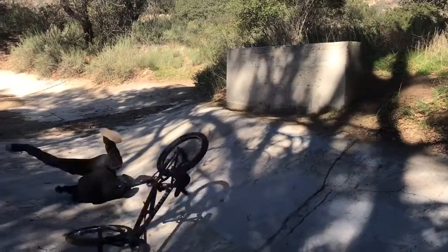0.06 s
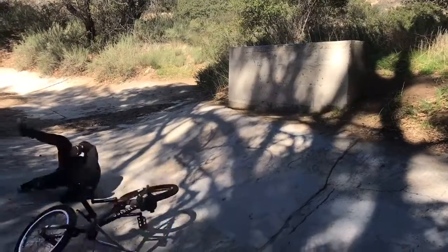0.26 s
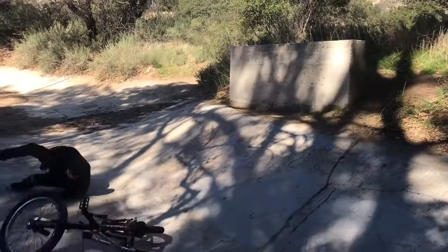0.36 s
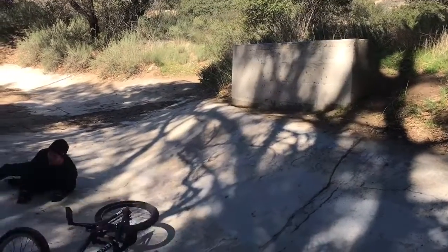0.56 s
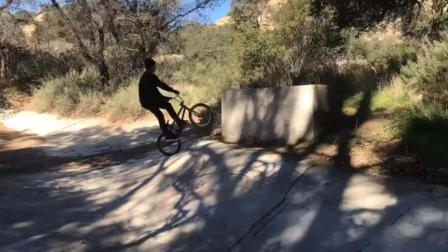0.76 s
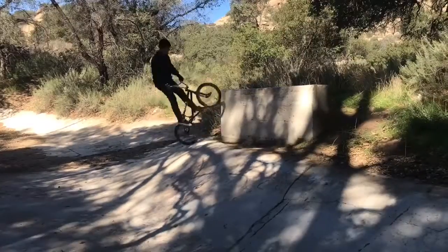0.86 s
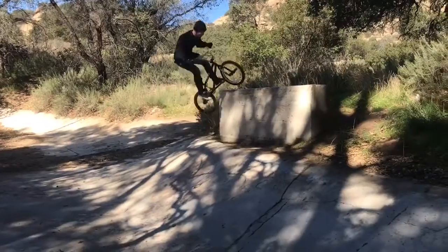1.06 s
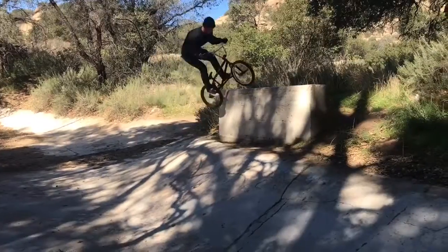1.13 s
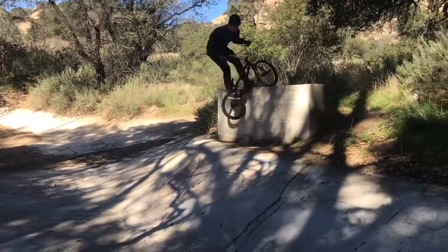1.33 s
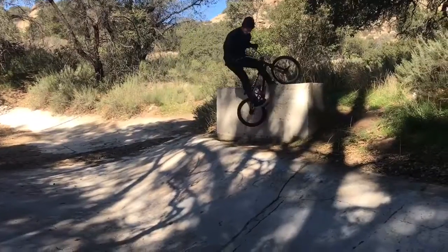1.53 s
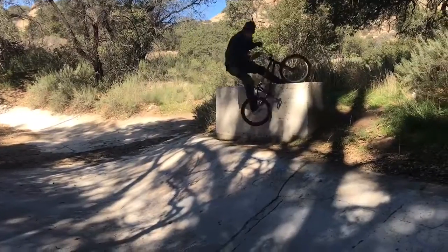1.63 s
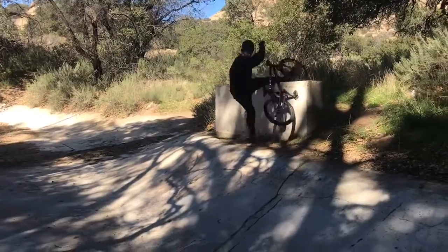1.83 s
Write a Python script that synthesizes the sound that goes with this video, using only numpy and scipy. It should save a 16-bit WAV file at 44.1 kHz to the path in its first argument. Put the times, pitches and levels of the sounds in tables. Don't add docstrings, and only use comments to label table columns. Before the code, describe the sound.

Bicycle slamming and scraping over concrete close by, abruptly followed by freewheel clicks and duller knocks

```python
import sys
import numpy as np
from scipy import signal
from scipy.fft import rfft, irfft, next_fast_len
from scipy.io import wavfile
from scipy.ndimage import map_coordinates

SR = 44100
rng = np.random.default_rng(int(sys.argv[2]) if len(sys.argv) > 2 else 0)


def ratio(d):
    e = np.asarray(d, float) / 20
    return 10 ** e


def int16_out(signal):
    q = np.round(np.clip(np.atleast_2d(signal).T, -1, 1) * 32767)
    wavfile.write(sys.argv[1], SR, q.astype(np.int16))


N = 83790
T = np.arange(N) / SR

# pitch_hz [Hz], level_db [dB]
CRACK_TONE = [(150, -36.5), (500, 3), (850, 4.5), (2000, 0), (4000, -2.5), (8000, -5.5), (10500, -10.5),
              (14000, -8.5), (16000, -12.5)]
# pitch_hz [Hz], level_db [dB], t60_s [s]
FRAME_MODES = [(663, -2.5, 0.092), (842.7, -3, 0.1), (914, 0, 0.067), (1164, -18, 0.25),
               (1290, -5.5, 0.029), (1730, -8.5, 0.026), (2300, -2, 0.042), (2675, 2.5, 0.019),
               (3740, 6.5, 0.013), (6160, -9.5, 0.043)]


def unit(x):
    return x / np.sqrt(np.mean(x ** 2) + 1e-20)


def along(points, hz):
    point_hz, value = np.transpose(points)
    return np.interp(np.log(hz + 1), np.log(point_hz + 1), value)


def level(rows):
    start_s, level_db = np.transpose(rows)[:2]
    return ratio(np.interp(T, start_s, level_db, left=-120, right=level_db[-1]))


def wobble(rate):
    knots = rng.standard_normal(int(N * rate / SR) + 4)
    return map_coordinates(knots, [T * rate])


def filtered(x, response):
    size = next_fast_len(len(x) + 8192)
    spectrum = rfft(x, size) * response(np.fft.rfftfreq(size, 1 / SR))
    return irfft(spectrum, size)[:len(x)]


def coloured_noise(count, tone):
    return filtered(rng.standard_normal(count), lambda f: ratio(along(tone, f)))


def frame_ring(t):
    out = np.zeros(len(t))
    for pitch_hz, level_db, t60_s in FRAME_MODES:
        struck_db = level_db + 2 * rng.standard_normal()
        out += ratio(struck_db - 60 * t / t60_s) * np.sin(2 * np.pi * pitch_hz * t)
    return out


def air():
    # pitch_hz [Hz], level_db [dB per Hz]
    air_tone = [(30, -25.5), (60, 0.5), (118, -10), (280, -16.5), (570, -26), (1200, -31), (1900, -42),
                (6000, -50), (16000, -59)]
    # start_s [s], level_db [dB over the still air]
    breeze = [(0, -10), (.85, 5.5), (.9, 6), (.99, 4), (1.06, 2.5), (1.2, 3), (1.4, 4), (1.9, -8)]
    low = lambda f: 1 / (1 + (f / 315) ** 4)
    rumble = filtered(rng.standard_normal(N), lambda f: ratio(along(air_tone, f)) * low(f))
    rumble = rumble * ratio(3.3 * wobble(13.22))
    leaves = filtered(rng.standard_normal(N), lambda f: ratio(along(air_tone, f)) * (1 - low(f)))
    leaves = leaves * level(breeze) * ratio(0.61 * wobble(45.4))
    return ratio(-42.5) * unit(rumble + leaves)


def scrape(rows, tone):
    grains_per_s, spread_db = 300, 5
    crackle_db, sing_db = -5, -21.5
    grit_above_hz = 4800

    grains = rng.random(N) < grains_per_s / SR
    grains = grains * ratio(spread_db * np.minimum(rng.exponential(size=N), 2))
    grain_decay = np.exp(-np.arange(400) / SR / .001)
    puffs = np.sqrt(np.abs(signal.fftconvolve(grains ** 2, grain_decay)[:N]))
    crackle = filtered(rng.standard_normal(N) * puffs, lambda f: ratio(along(tone, f)) * f / (f + 2500))

    hiss = sum(coloured_noise(N, tone) * ratio(3 * wobble(rate)) for rate in (30, 80))

    rubbing = rng.standard_normal(N) * ratio(3 * wobble(40))
    sing = signal.fftconvolve(rubbing, frame_ring(np.arange(SR // 4) / SR))[:N]

    mix = unit(hiss) + ratio(crackle_db) * unit(crackle) + ratio(sing_db) * unit(sing)
    grit = filtered(mix, lambda f: f ** 2 / (f ** 2 + grit_above_hz ** 2))
    start_s, _, bright_db = np.transpose(rows)
    grit_gain = ratio(np.interp(T, start_s, bright_db)) - 1
    return level(rows) * (mix + grit_gain * grit)


def knocks(rows, attack_s):
    bright_boost_db, bright_width = 11, .45
    chatter_db, chatter_t60_s = -17, .28
    frame_db = -8.5
    out = np.zeros(N + SR)
    t = np.arange(SR // 3) / SR
    rise = 1 - np.exp(-t / attack_s)
    for start_s, level_db, bright_hz, contact_s, t60_s in rows:
        def tone(f):
            peak = np.exp(-(np.log((f + 1) / bright_hz) / bright_width) ** 2)
            return ratio(along(CRACK_TONE, f) + bright_boost_db * peak)

        shape = rise * ratio(-60 * np.maximum(t - contact_s, 0) / max(t60_s, .008))
        lumps = np.clip(rng.standard_normal(len(t) // 110 + 1), -2, 1.3)
        lumpy = ratio(3 * np.repeat(lumps, 110)[:len(t)])
        burst = filtered(lumpy * rng.standard_normal(len(t)), tone) * shape
        burst = burst * np.linalg.norm(shape) / np.linalg.norm(burst)

        rattle = filtered(lumpy * rng.standard_normal(len(t)), lambda f: ratio(along(CRACK_TONE, f)))
        chatter = unit(rattle) * rise * ratio(chatter_db - 60 * t / chatter_t60_s)

        push = shape[:600] * rng.standard_normal(600)
        steel = signal.fftconvolve(frame_ring(t), push / np.linalg.norm(push))[:len(t)]

        out[round(start_s * SR):][:len(t)] += ratio(level_db) * (burst + chatter + ratio(frame_db) * steel)
    return filtered(out[:N], lambda f: f ** 2 / (f ** 2 + 260 ** 2))


def pings():
    # start_s [s], level_db [peak dB], pitch_hz [Hz], t60_s [s]
    struck_parts = [(0.034, -30, 5600, .015), (.111, -28, 7770, 0.025), (.123, -37.5, 7520, 0.073),
                    (.149, -34, 6500, .015), (.204, -30, 7200, 0.037), (.205, -28, 1037, 0.045),
                    (0.2693, -21, 6160, 0.029), (0.2985, -13, 1740, 0.021), (.2995, -15, 950, 0.02),
                    (.321, -7.5, 3480, .02), (0.3243, -8.5, 2730, 0.012), (.3235, -5.5, 3760, 0.0073),
                    (0.323, -25, 3970, 0.014), (.557, -18, 635, 0.1), (.808, -16.5, 640, 0.054),
                    (1.629, -25, 4640, .018), (1.748, -26, 674, 0.046), (0.394, -26, 5900, 0.0045),
                    (.47, -35, 5200, .02), (0.481, -27, 8800, 0.014), (.495, -29.5, 2300, 0.035),
                    (.545, -41, 6200, 0.016), (.555, -13, 1140, .018), (.557, -11.5, 890, 0.054),
                    (.556, -19, 2043, 0.09), (.76, -28, 890, 0.033), (.806, -5.5, 1940, 0.033),
                    (.806, -13, 821, 0.03), (0.812, -11.5, 1265, 0.052), (.806, -14.5, 3720, 0.041),
                    (1.385, -7, 1395, 0.016), (1.384, -15.5, 2494, 0.019), (1.385, -23, 3970, 0.025),
                    (1.387, -24, 6900, .023), (1.431, -24.5, 933, 0.024), (1.453, -23, 1080, 0.035),
                    (1.463, -29, 980, 0.024), (1.4919, -16, 1280, 0.02), (1.498, -22.5, 1040, 0.042),
                    (1.498, -19, 2910, 0.03), (1.527, -21.5, 3230, 0.012), (1.538, -27, 1800, .02),
                    (1.6188, -23, 2270, 0.033), (1.627, -10, 910, 0.01), (1.63, -20, 3120, 0.015),
                    (1.63, -17.5, 1820, 0.042), (1.653, -21, 1670, 0.018), (1.671, -22, 1930, 0.016),
                    (1.746, -26, 1870, 0.021), (1.747, -28.5, 2650, 0.1)]
    out = np.zeros(N)
    for start_s, level_db, pitch_hz, t60_s in struck_parts:
        t = np.maximum(T - start_s, 0)
        envelope = ratio(level_db - 60 * t / t60_s) * (1 - np.exp(-t / 0.0003))
        out += envelope * np.sin(2 * np.pi * pitch_hz * t)
    return out * ratio(1.5 * wobble(600))


def thuds(rows, rough):
    out = np.zeros(N)
    for start_s, level_db, pitch_hz, t60_s in rows:
        t = np.maximum(T - start_s, 0)
        drift = 0.72 * wobble(12.3) * (1 - np.exp(-20 * t))
        swing = np.sin(2 * np.pi * pitch_hz * t + drift)
        neighbour_hz = pitch_hz * (0.988 + 0.31 * rng.random())
        swing += rough * np.sin(2 * np.pi * neighbour_hz * t)
        out += ratio(-0.5 + level_db - 60 * t / t60_s) * (1 - np.exp(-t / 0.0027)) * swing
    return out


def tyre_hum():
    # start_s [s], level_db [dB]
    hum_swell = [
        (.39, -59),
        (.43, -39.5),
        (.49, -37),
        (.55, -62),
        (.56, -85),
    ]
    return level(hum_swell) * np.sqrt(2) * np.sin(2 * np.pi * 224.5 * T + .5 * wobble(11))


def drone():
    # start_s [s], level_db [dB]
    engine_swell = [(0.86, -68), (0.882, -36.5), (1.038, -47), (1.548, -38.5), (1.858, -38.5), (1.9, -65)]
    pitch_hz, width_hz = 58.5, 3.5
    hum = filtered(rng.standard_normal(N), lambda f: 1 / (1 + ((f - pitch_hz) / width_hz) ** 2))
    steady = np.sin(2 * np.pi * pitch_hz * T + .7 * wobble(5))
    return level(engine_swell) * unit(steady + .25 * unit(hum))


def freewheel(speed):
    # pitch_hz [Hz], width_hz [Hz], level_db [dB]
    hub_modes = [(4250, 500, 0), (3600, 500, -5), (8800, 1800, -10), (6400, 1500, -14), (14500, 2500, -17)]
    tick_db, grows_db, tick_t60_s = -48, 4, .026
    start_s, ticks_per_s = np.transpose(speed)
    rate = np.interp(T, start_s, ticks_per_s, left=0, right=0) * ratio(.3 * wobble(60))
    turns = np.cumsum(rate) / SR + .97
    ticks = np.diff(np.floor(turns), prepend=0)
    growth_db = grows_db * np.interp(T, start_s, ticks_per_s) / 100
    ticks = ticks * ratio(3 * rng.standard_normal(N) + growth_db)
    decay = ratio(-60 * np.arange(1500) / SR / tick_t60_s)
    puffs = signal.fftconvolve(ticks, decay)[:N] * rng.standard_normal(N)

    def hub(f):
        response = 0.071 * f / (f + 3000)
        for pitch_hz, width_hz, level_db in hub_modes:
            band = 1j * f * width_hz
            response = response + ratio(level_db) * band / (pitch_hz ** 2 - f ** 2 + band)
        return response

    return ratio(tick_db) * filtered(puffs, hub)


def scene():
    # start_s [s], level_db [dB], bright_hz [Hz], contact_s [s], t60_s [s]
    crash_blows = [(.032, -36.5, 5800, 0.0013, 0.03), (.111, -38, 8450, 0.014, 0.041),
                   (.204, -33, 7200, 0.0024, 0.018), (.214, -51, 5000, 0.0018, 0.031),
                   (.227, -20, 910, 0.0033, 0.042), (.27, -22, 11000, 0.0016, 0.028),
                   (.299, -20, 1490, 0.0015, 0.017), (.3205, -12, 2930, 0.0044, 0.0073),
                   (.452, -35, 7260, 0.0022, 0.022), (.555, -6.5, 1470, 0.0036, 0.047),
                   (.626, -30, 7800, 0.00065, 0.058), (.722, -52, 1510, 0.0018, 0.073),
                   (.788, -26, 3720, 0.0017, 0.037), (.806, -10, 1990, 0.00051, 0.074)]
    block_blows = [(1.372, -45.5, 2500, 0.0078, 0.046), (1.384, -21.5, 1900, 0.0045, 0.021),
                   (1.439, -38, 3980, 0.0017, 0.021), (1.466, -32, 3950, 0.0025, 0.022),
                   (1.494, -21, 1210, 0.0039, 0.057), (1.57, -41, 3550, 0.008, 0.034),
                   (1.614, -31.5, 2250, 0.0016, 0.052), (1.627, -13.5, 2830, 0.0028, 0.024),
                   (1.671, -28, 1840, 0.0022, 0.029), (1.746, -26, 1830, 0.0034, 0.11),
                   (1.776, -34, 2620, 0.0012, 0.022), (1.84, -37, 2670, 0.0025, 0.037)]
    crash_scuffs = [
        (.235, -29.5, 1580, 0.025, 0.051),
        (.354, -25, 2600, 0.0098, 0.046),
        (.756, -24, 870, 0.011, 0.2),
    ]
    block_scuffs = [(.872, -45.5, 2120, 0.0079, 0.29), (1.155, -52, 1870, 0.029, .04),
                    (1.39, -23, 1220, 0.0095, 0.039), (1.429, -33, 1070, 0.044, 0.05),
                    (1.638, -25, 1610, 0.0065, 0.15), (1.804, -32, 2600, 0.0093, 0.085),
                    (1.884, -38, 3480, 0.015, 0.099)]
    # start_s [s], level_db [dB], pitch_hz [Hz], t60_s [s]
    landings = [(.221, -15, 302, 0.094), (.3, -18.5, 125, 0.067), (.322, -7, 186, 0.018),
                (.556, -12.5, 176, 0.065), (.558, -16, 95.6, 0.097), (.325, -20, 91, 0.12),
                (.73, -30, 102, 0.15), (.765, -19.5, 225, 0.1), (.808, -18.5, 212, 0.091),
                (.81, -17, 358, 0.096), (1.385, -17, 143, 0.016), (1.5, -33.5, 137.6, 0.18),
                (1.63, -34.5, 122, 0.15), (1.632, -23.5, 274, 0.091)]
    tyre_air = [
        (.236, -22, 228.4, 0.37),
        (.556, -30.5, 228.5, 0.54),
    ]
    # start_s [s], level_db [dB], bright_db [dB]
    skid = [(0, -38.5, 5.5), (.1, -39, 0.5), (.145, -40.5, 5.5), (.16, -34.5, -13.5), (.2, -45, 5),
            (.23, -34.5, 12.5), (.3, -32.5, -7), (.42, -33.5, 1), (.49, -37.5, 4.5), (.515, -42, 0),
            (.55, -32.5, 4.5), (.68, -37, 0.5), (.85, -25.5, -7)]
    jostle = [(1.37, -61.5, 16.5), (1.434, -31.5, -12), (1.485, -40, -12), (1.53, -31.5, 1),
              (1.56, -42.5, 7), (1.604, -39.5, 7.5), (1.7, -39.5, -2.5), (1.778, -49, 4), (1.87, -47.5, -6),
              (1.9, -50, 0)]
    # pitch_hz [Hz], level_db [dB per Hz]
    skid_tone = [(40, 5), (95, -11), (200, 5), (430, -8), (800, 4), (1800, -5.5), (7500, -14),
                 (10500, -20.5), (16000, -18)]
    jostle_tone = [(150, -0.5), (300, 9), (735, 7), (1270, 2.5), (2860, -0.5), (5500, -13), (10500, -17.5),
                   (16000, -20)]
    # start_s [s], tick_rate [ticks a second]
    coast = [(.862, 105), (.9, 75), (.94, 30), (.975, 57)]
    spin_up = [(1.05, 44), (1.1, 60), (1.14, 76), (1.19, 88), (1.26, 104), (1.38, 107)]
    scuff_attack_s, blow_attack_s = .004, .0004

    low = thuds(landings, rough=0.83)
    steel = pings()
    second_try = T > 1

    first = scrape(skid, skid_tone) + ratio(2) * air()
    first += knocks(crash_blows, blow_attack_s) + knocks(crash_scuffs, scuff_attack_s)
    first += steel + low + thuds(tyre_air, rough=0.15) + tyre_hum()

    second = air() + drone() + freewheel(coast) + freewheel(spin_up)
    second += knocks(block_blows, blow_attack_s) + knocks(block_scuffs, scuff_attack_s)
    second += scrape(jostle, jostle_tone) + (low + steel) * second_try

    fade_out = np.interp(T, (.815, .849), [1, 0])
    fade_in = np.interp(T, (.843, .89), [0, 1])
    return (first * fade_out + second * fade_in)[None]


def top_cut(x):
    return signal.sosfilt(signal.butter(12, 16790, fs=SR, output="sos"), x)


def record(dry):
    x = filtered(dry[0], lambda f: f ** 8 / (f ** 8 + 44 ** 8))
    x = x / (1 + np.abs(x) ** 6) ** (1 / 6)
    x = filtered(x, lambda f: ratio(-38 * np.clip((f - 15800) / 250, 0, 1)))
    return top_cut(x[None])


dry = scene()
out = record(dry)
int16_out(out)
```